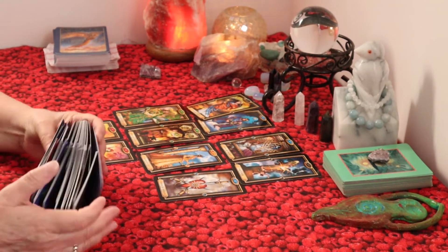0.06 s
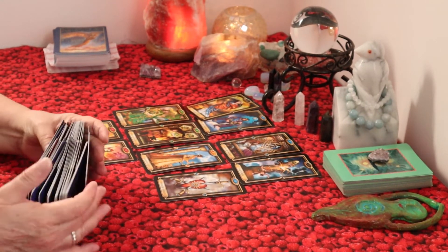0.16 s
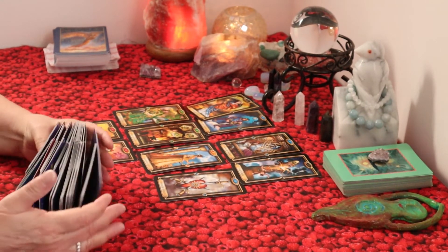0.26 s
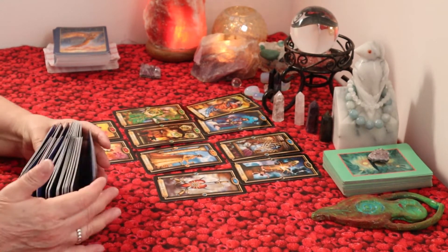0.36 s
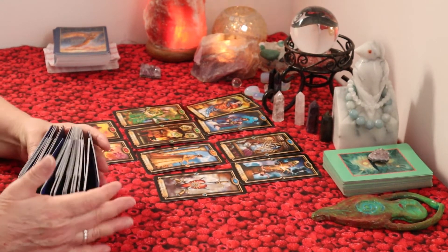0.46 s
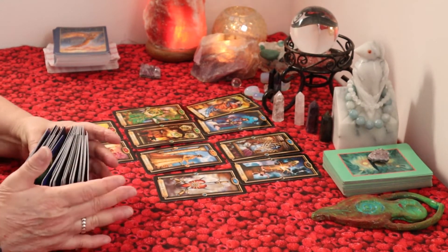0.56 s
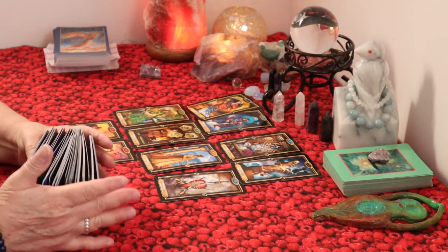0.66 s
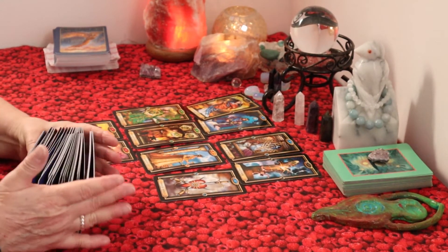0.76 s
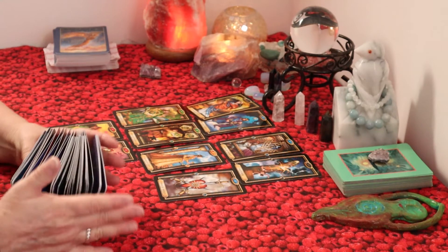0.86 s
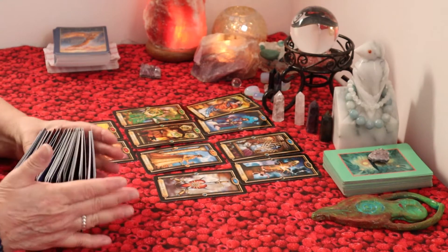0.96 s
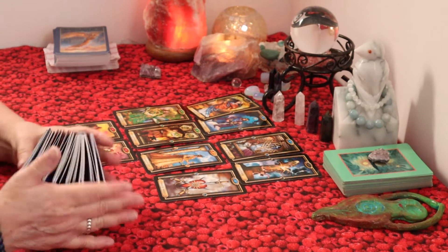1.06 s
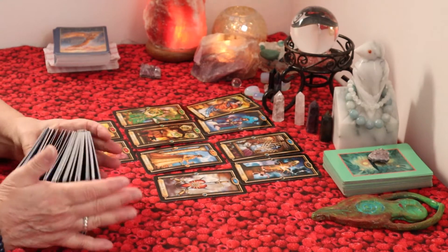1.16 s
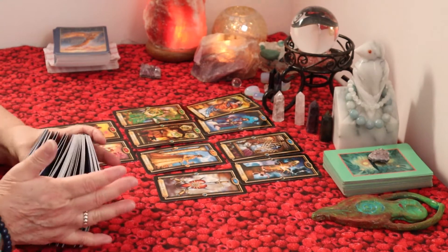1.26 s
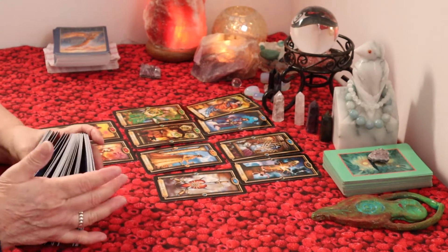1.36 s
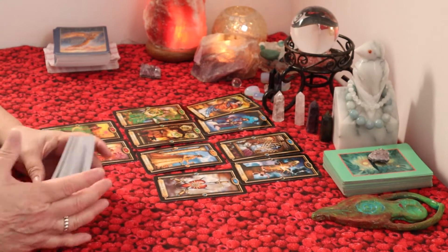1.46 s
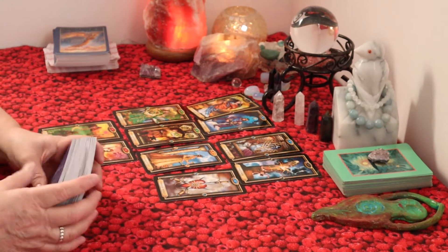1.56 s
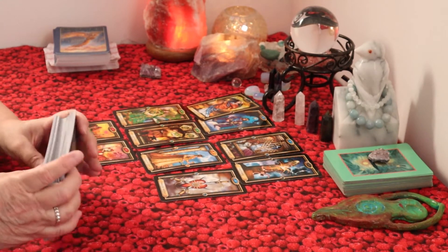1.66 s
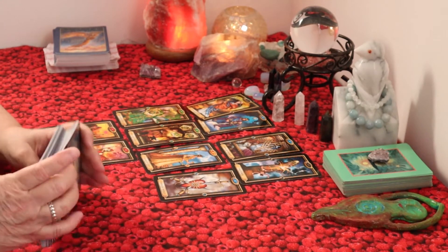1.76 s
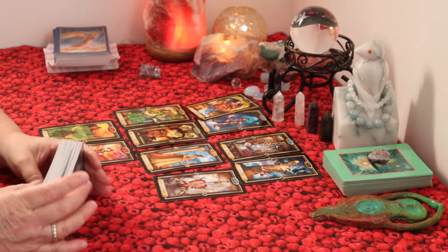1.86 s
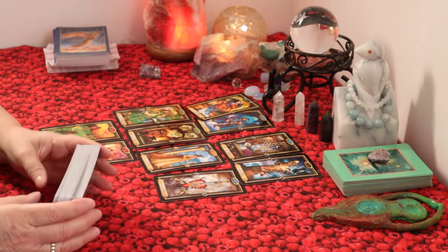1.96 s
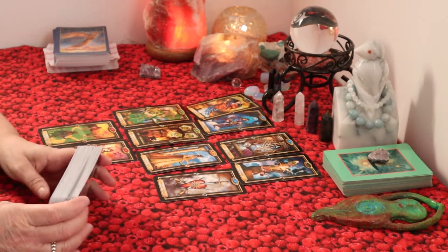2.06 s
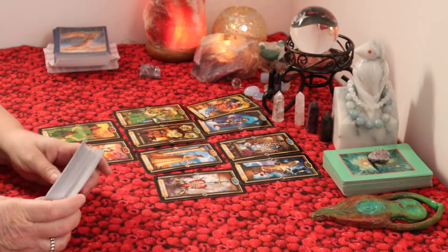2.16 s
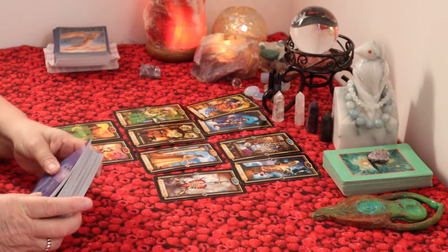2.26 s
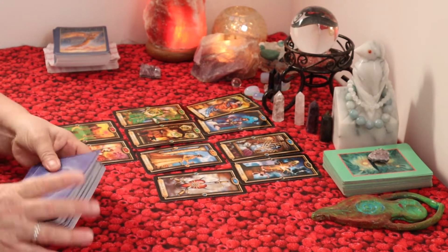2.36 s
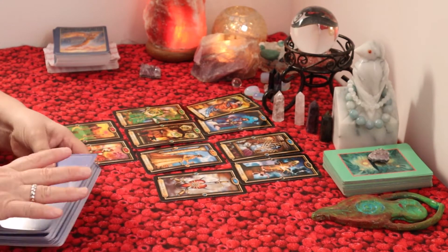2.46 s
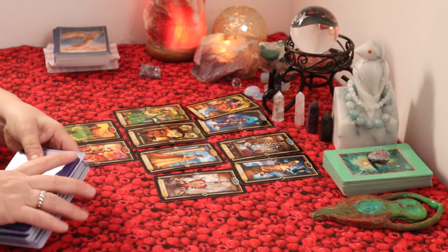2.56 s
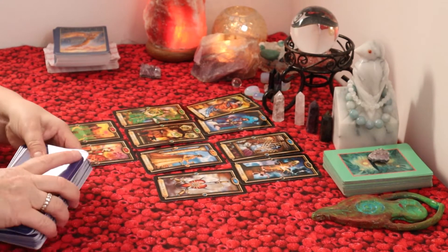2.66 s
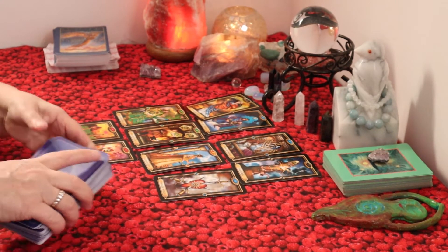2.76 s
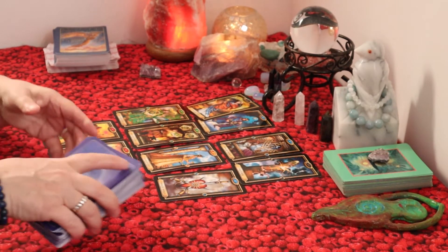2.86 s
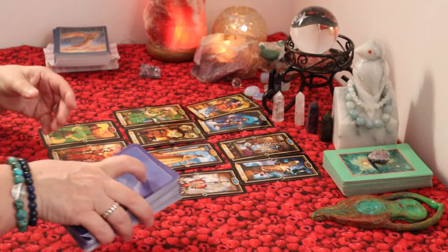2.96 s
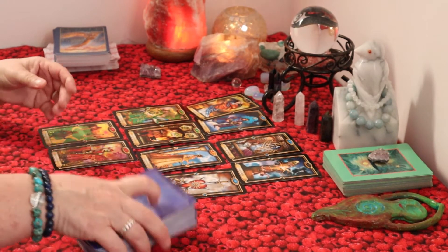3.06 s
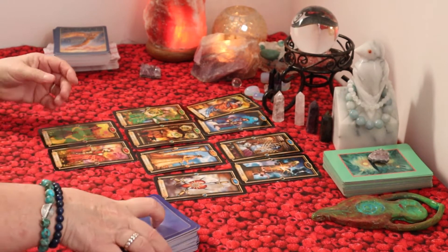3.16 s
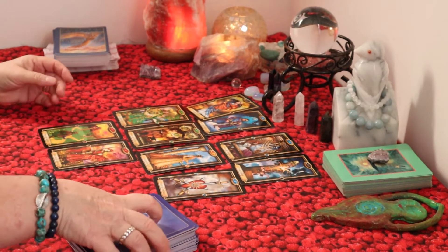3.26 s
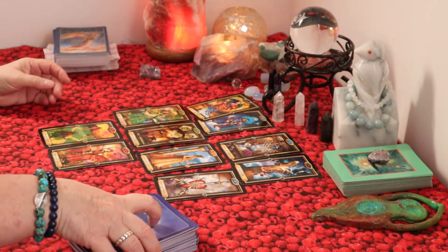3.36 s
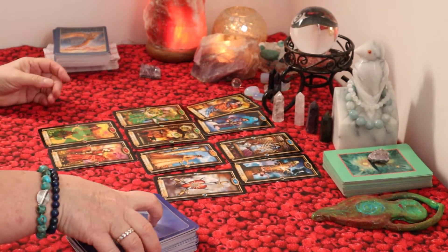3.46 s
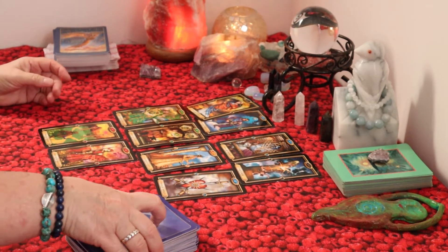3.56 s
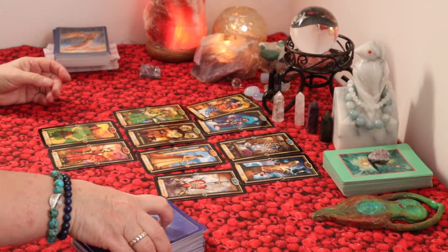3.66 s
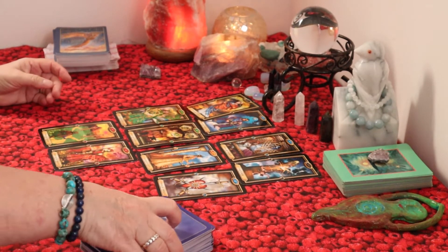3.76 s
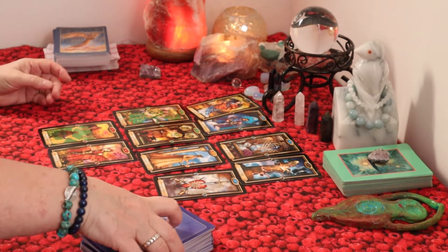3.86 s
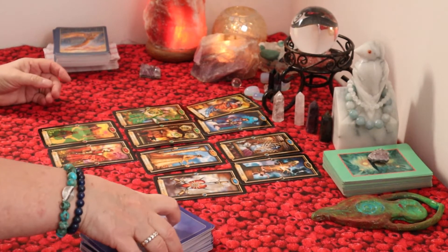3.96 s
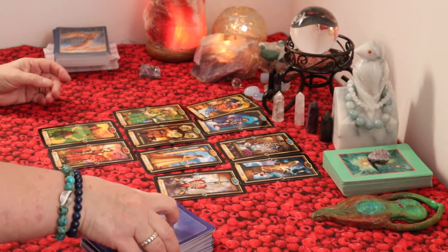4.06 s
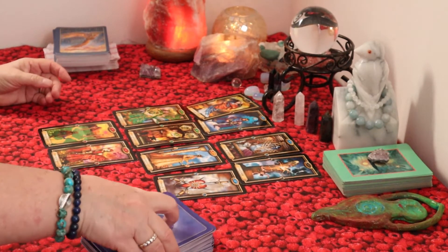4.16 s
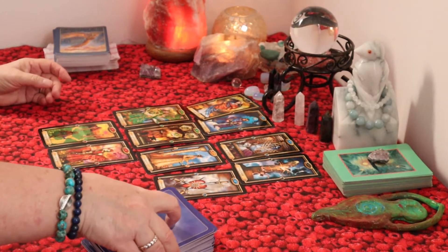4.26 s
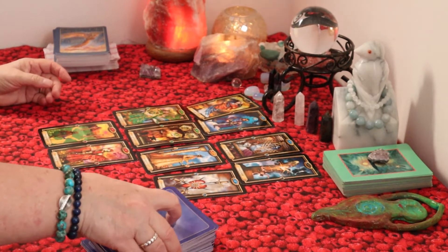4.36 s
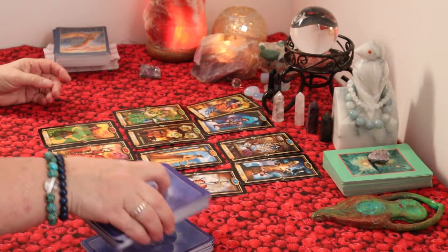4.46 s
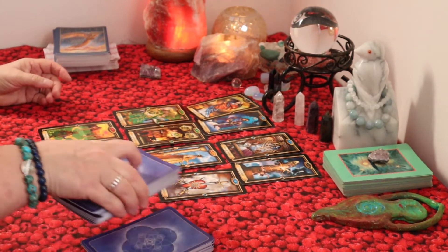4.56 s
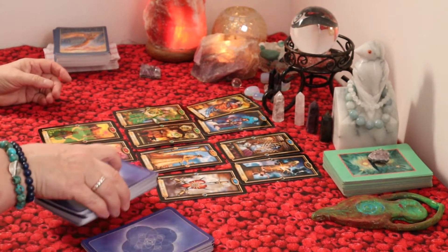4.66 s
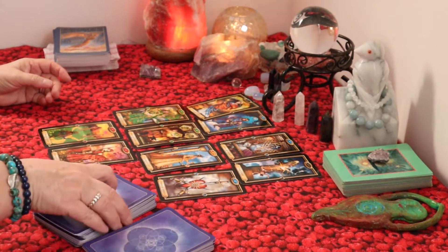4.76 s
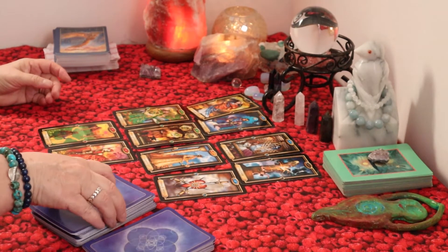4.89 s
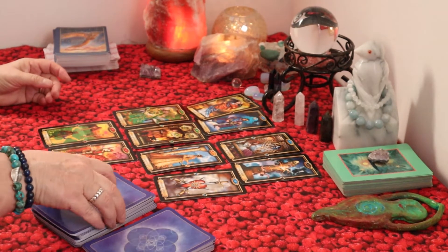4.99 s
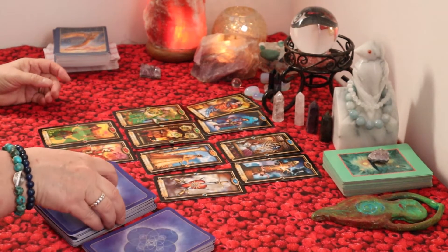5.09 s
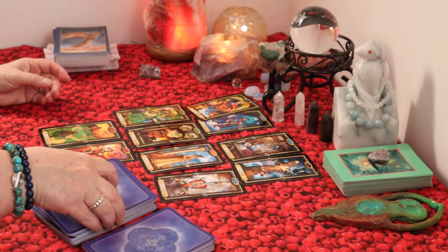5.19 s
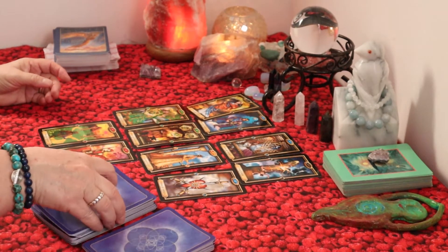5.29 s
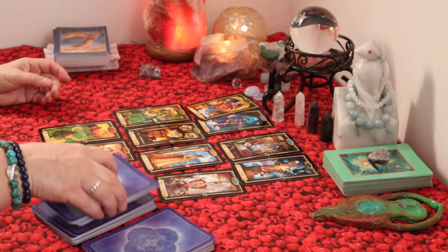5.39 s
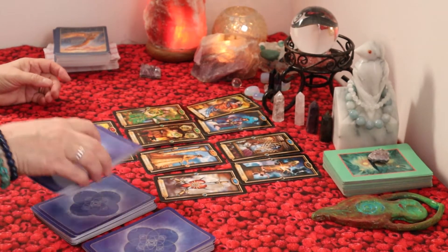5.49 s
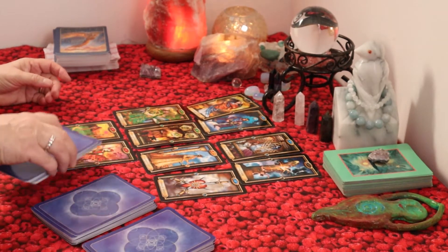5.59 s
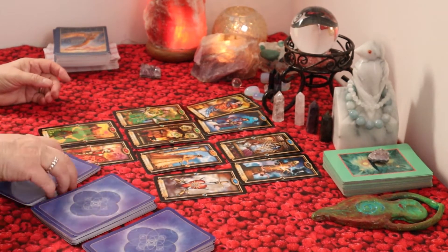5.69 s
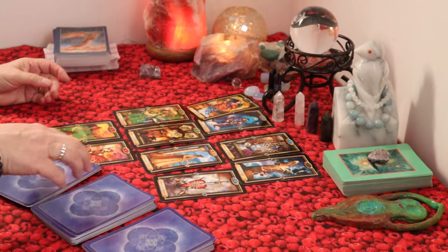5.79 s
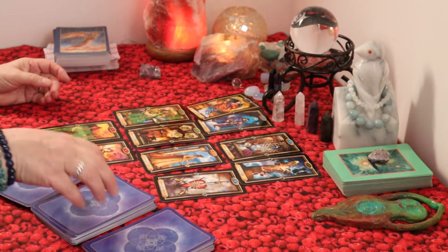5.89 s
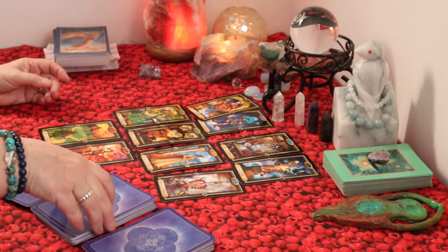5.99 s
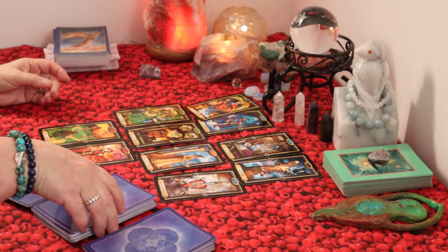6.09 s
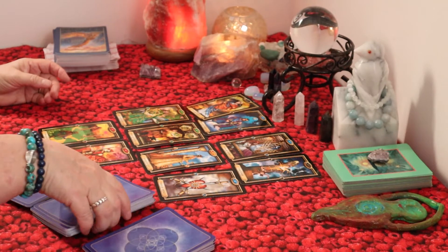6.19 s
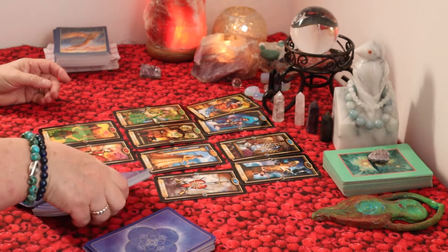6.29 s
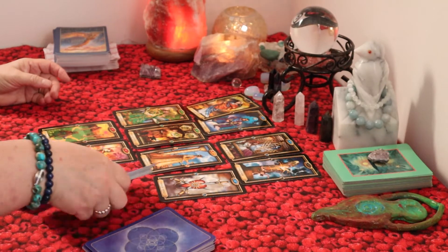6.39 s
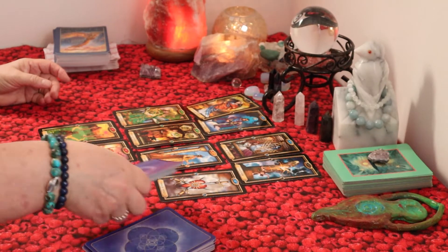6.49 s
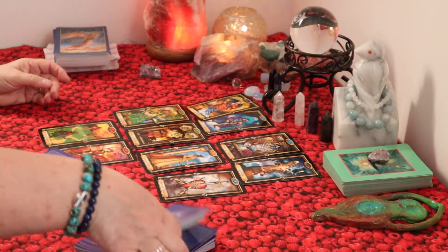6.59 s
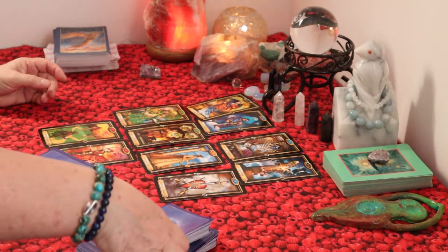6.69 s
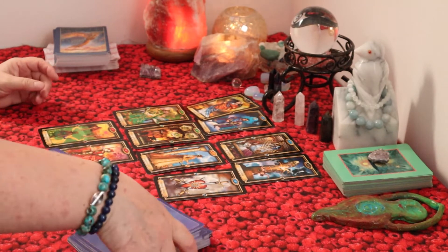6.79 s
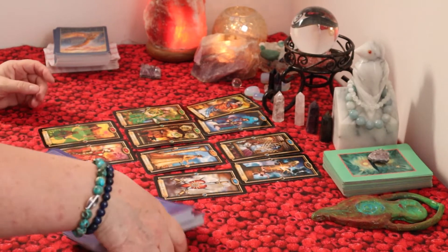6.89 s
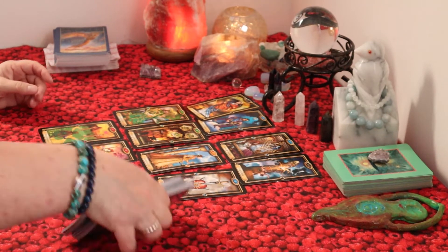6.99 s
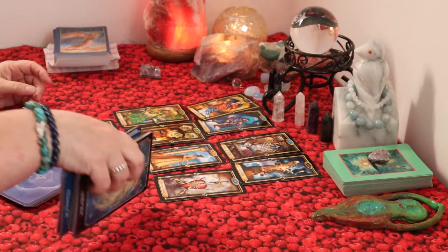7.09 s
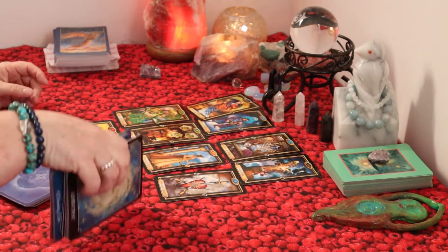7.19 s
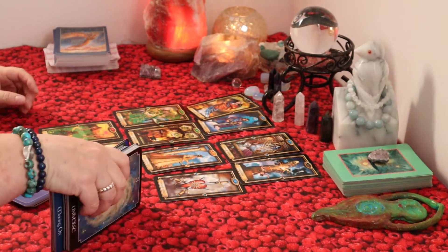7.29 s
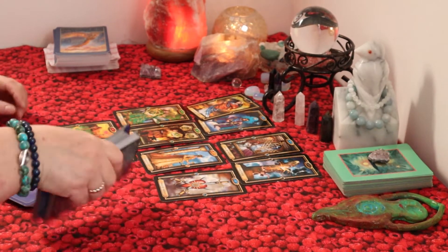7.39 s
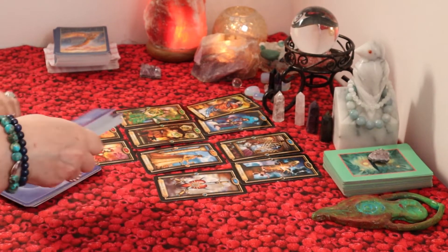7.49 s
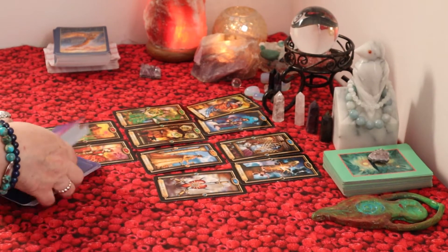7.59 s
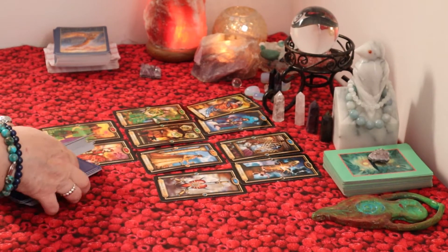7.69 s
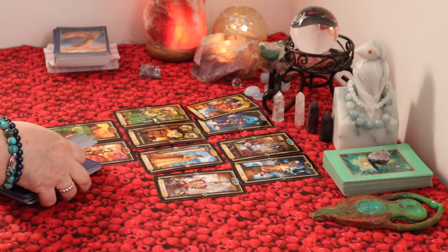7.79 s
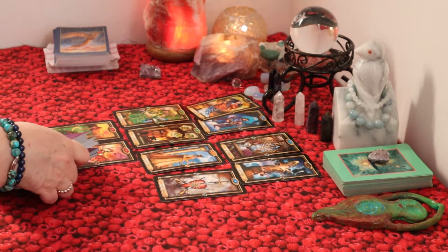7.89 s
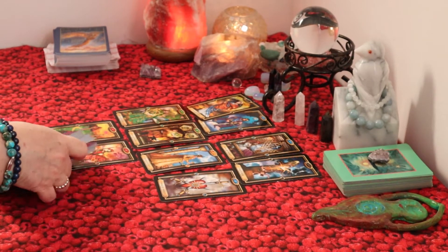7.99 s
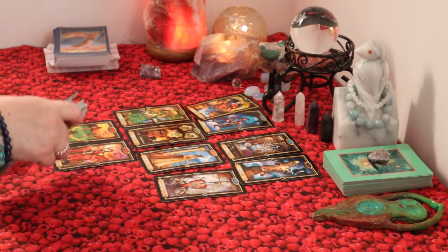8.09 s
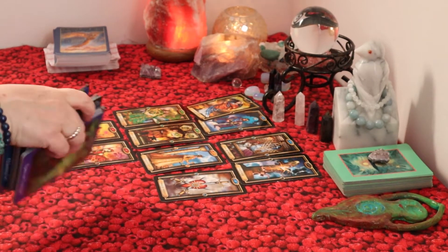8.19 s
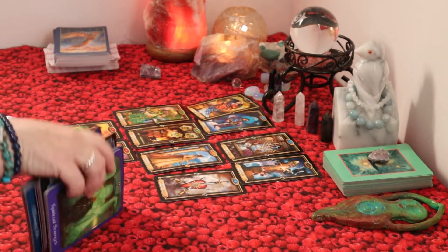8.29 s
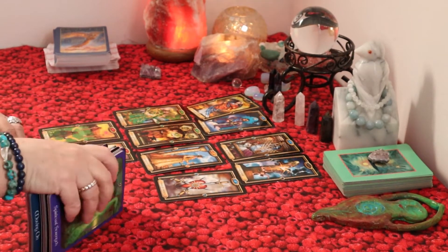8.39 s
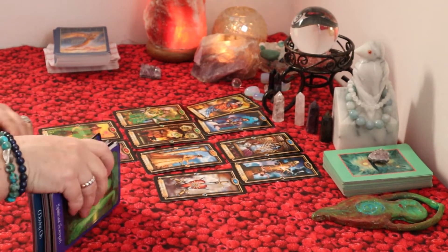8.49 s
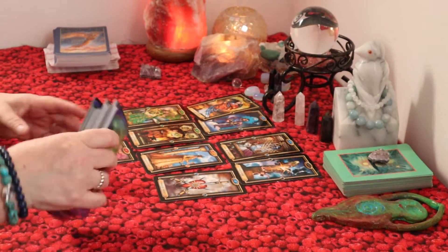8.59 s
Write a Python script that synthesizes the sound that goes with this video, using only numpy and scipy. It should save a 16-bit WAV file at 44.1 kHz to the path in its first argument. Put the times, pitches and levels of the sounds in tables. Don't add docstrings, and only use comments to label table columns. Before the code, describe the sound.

A deck of large cards is handled close to the microphone in a small room, over a faint steady hiss. From 0 to 1.5 s it is shuffled overhand: uneven soft packet slaps, strongest near 1 s, with fine papery hisses and small edge flicks. At 1.8 s the squared deck knocks sharply with an immediate rebound. Until 2.6 s, cards slide and settle lightly. At 3.1 s a hard flat slam drums the cloth-covered table with a deep thud. Quiet rubbing follows; at 4.7, 5.2 and 5.7 s piles are set down with muted thumps and a bright flick. From 6.1 to 6.8 s piles scrape, tap and snap together as they are gathered. A hard, cracking knock lands at 7.2 s, then soft sliding and faint taps, and a final quick double knock at 8.3 s, trailing into light rubbing until about 8.6 s.

```python
import sys
import numpy as np
from scipy import signal
from scipy.fft import rfft, irfft, next_fast_len
from scipy.io import wavfile
from scipy.ndimage import uniform_filter1d, map_coordinates

SR = 44100
rng = np.random.default_rng(int(sys.argv[2]) if len(sys.argv) > 2 else 0)


def volts_from_db(level):
    exponent = np.asarray(level, float) / 20
    return 10 ** exponent


def unload_wav(signal):
    wavfile.write(
        sys.argv[1],
        SR,
        np.round(np.clip(np.atleast_2d(signal).T, -1, 1) * 32767).astype(np.int16),
    )


N = 381465
SIZE = 24576

# t/s, peak level/dB, edge crack re peak/dB, stack f/Hz
PACKETS = [(0.004, -32, -9, 441), (0.074, -30, -17, 503), (0.147, -48.5, -1.5, 345), (0.29, -30.5, -7, 346),
           (0.408, -30.5, -15.5, 346), (0.585, -37, -31, 350), (0.642, -37.5, -18, 480),
           (0.771, -29.5, -35, 330), (0.859, -39, 0, 363), (0.906, -35, -13, 460), (0.974, -20, -12, 700),
           (0.997, -21.5, -12, 480), (1.062, -42, 0, 422), (1.176, -25, -14.5, 355), (1.234, -35, 0, 480),
           (1.254, -28, -30, 285), (1.358, -33.5, -10, 514), (1.525, -47, -6.5, 328)]
# t/s, peak level/dB, table top re peak/dB, edge crack re peak/dB, stack f/Hz
SLAMS = [
    (1.8, -8, -26.5, -3, 560),
    (1.82, -11, -28.5, -4.5, 580),
    (3.104, -4, -15.5, -14.5, 334),
    (7.21, -18, -17, -6, 520),
    (7.221, -4, -37, -8, 597),
    (8.318, -9, -23, -2.5, 543),
    (8.33, -7.5, -26, -7.5, 374),
]
# t/s, peak level/dB, table top re peak/dB, edge crack re peak/dB, stack f/Hz
PILES = [(1.999, -43.5, -7.5, -15, 636), (2.143, -41, -7.5, 2, 355), (2.381, -35, -14.5, -15, 348),
         (3.87, -50.5, -13, -10.5, 696), (4.21, -63.5, -8.5, 1.5, 330), (4.702, -28.5, -5.5, -8.5, 432),
         (4.784, -51.5, 7, -23, 285), (5.204, -44, 5, -22, 302), (5.673, -36.5, -1.5, -8, 335),
         (5.693, -27, -19, -21.5, 342), (6.144, -34.5, -19, -4, 598), (6.599, -36, -5.5, -2, 305),
         (6.649, -46, 5.5, -14, 290), (6.704, -28, -16, -12.5, 540), (6.792, -36.5, -10, -22, 670),
         (7.523, -40, -39, -28, 560), (7.595, -49.5, -4, 1, 333), (7.653, -37.5, -10.5, -28, 280),
         (7.849, -42.5, -24, -8, 790)]
# t/s, peak level/dB, f/Hz
HOLLOW = [
    (0.975, -22, 440),
    (1.175, -25.5, 373),
    (1.801, -13, 275),
    (2.381, -38.5, 332),
    (4.7, -28.5, 241),
    (6.717, -28.5, 318),
    (7.221, -15, 265),
]
# t of crest/s, fine hiss level/dB
PULLS = [
    (0.08, -55),
    (0.303, -58),
    (0.478, -58),
    (0.552, -76),
    (0.661, -59),
    (0.865, -54.5),
    (1.069, -55),
]
PULL_SHAPE = (8.2, 18.3, 28)
# t of crest/s, fine hiss level/dB, scrape re fine hiss/dB
SKIDS = [
    (1.811, -63.5, 20),
    (3.112, -46.5, 9.5),
    (4.714, -66, 10),
    (4.768, -68.5, 9.5),
    (5.204, -84, 12),
    (5.673, -74, 4),
    (6.706, -65.5, 15),
    (7.223, -61.5, 16),
    (8.34, -58, 14.5),
]
SKID_SHAPE = (6.3, 35.5)  # rise/ms, fall/ms
# t of crest/s, fine hiss level/dB, scrape re fine hiss/dB, fall/ms
DRAGS = [(1.258, -63, 3, 150), (1.58, -69.5, 4.5, 99), (2.013, -71, 3, 110), (2.129, -57.5, 2, 79),
         (2.312, -62, 7, 7.7), (2.558, -61.5, 8, 14), (3.324, -74.5, 4, 32), (3.63, -75.5, 12.5, 140),
         (3.831, -83, -15.5, 81), (6.151, -71.5, 18.5, 55), (6.239, -60, -2.5, 21), (6.372, -56.5, 10, 27),
         (6.6, -64, 5, 30), (6.797, -63, 9, 120), (7.043, -63, 7, 23), (7.289, -63, -0.5, 44),
         (7.462, -70.5, 12, 55), (7.596, -66.5, 7, 99), (7.825, -66, 9.5, 46), (8.005, -70.5, 2, 21),
         (8.222, -65.5, 3.5, 23), (8.451, -67.5, 10, 140), (8.605, -67, 5, 67)]
# t/s, effort as rumble level/dB
STIR = [(0, -43), (0.11, -60), (0.42, -51), (0.55, -56), (1.1, -38.5), (1.5, -56.5), (1.8, -68),
        (2.19, -51), (2.33, -68), (3.47, -66), (3.68, -49.5), (3.85, -64), (4.68, -77.5), (5.9, -66),
        (7.1, -54), (7.3, -79), (7.75, -52.5), (8.65, -79.5)]
# t/s, peak level/dB, top re body/dB, card f/Hz
FLICKS = [(0.0606, -33.5, -6, 1500), (0.29, -39, -11, 2330), (0.3937, -47, -1, 2400),
          (0.4435, -53, 0, 1800), (0.4604, -52, -11, 2690), (0.634, -53, 8, 2350), (1.041, -45, -7, 1690),
          (1.065, -34, -3, 1920), (1.198, -55, 14, 1870), (1.2352, -37, 2, 1590), (2.3055, -55, -13, 1820),
          (2.437, -49, -13, 3220), (2.5462, -45, 1, 900), (3.1033, -23, -31, 2050),
          (3.2347, -33.5, -10.5, 2410), (3.871, -49, -22, 2360), (4.7037, -38, -27, 1600),
          (5.2018, -42, -4, 1790), (5.672, -28.5, -7, 3520), (6.1448, -29.5, -15, 2400),
          (6.336, -47, -30, 2550), (6.574, -35.5, -3, 2260), (6.6013, -25, -12, 1820),
          (6.7, -19, -17.5, 3000), (6.7913, -34.5, -13.5, 1610), (6.8434, -34.5, -8, 2500),
          (7.2216, -7.5, -41, 2780), (7.8231, -43, -42, 1610), (7.9046, -43, -26, 1620),
          (7.9984, -42.5, -18, 1585)]
# t/s, peak level/dB
THUDS = [(0.491, -49.5), (0.761, -53), (0.868, -53), (1.058, -49), (1.166, -43.5), (1.234, -42.5),
         (1.506, -54), (1.791, -42.5), (1.988, -49), (2.363, -58), (3.093, -24.5), (3.86, -56.5),
         (4.193, -52.5), (4.702, -33), (4.78, -36), (4.959, -58), (5.193, -35.5), (5.398, -54.5),
         (5.672, -42.5), (6.017, -54), (6.237, -55.5), (6.578, -41.5), (6.646, -43), (6.783, -47),
         (6.969, -57), (7.206, -40), (7.6, -50), (7.649, -47.5), (7.906, -55), (8.309, -33.5)]
# f/Hz, level/dB, t60/s
TABLE_TOP = [(134.9, 1.5, 0.41), (206.8, -7.5, 0.22), (255.5, -9, 0.27), (345, -3, 0.5), (420, -13, 0.49),
             (501, -11.5, 0.42)]
# f/Hz, density level/dB
CRACK_COLOUR = [(300, -40), (700, -3.5), (1500, -6.5), (3000, -15), (4500, -35), (9000, -57),
                (16000, -90.5)]
# f/Hz, density level/dB
FINE_COLOUR = [(2500, -39), (5000, 3.5), (8000, 0.5), (11000, -0.5), (12600, -4.5), (15500, -20.5)]
# f/Hz, density level/dB
SCRAPE_COLOUR = [(400, -23.5), (900, -0.5), (2500, -0.5), (4500, -4), (7000, -30), (12000, -57.5)]
# f/Hz, density level/dB
HANDS_COLOUR = [(18, -45.5), (35, 2), (97, -5), (135, 1), (200, -7), (340, 0), (500, -8), (1200, -19),
                (2600, -69)]
# f/Hz, t60/s
ROOM = [(60, .45), (160, 0.32), (350, 0.45), (600, 0.35), (1100, 0.44), (2900, 0.3), (7700, 0.32)]
# f/Hz, side re mid/dB
CARDS_SIDE = [(60, -26.5), (110, -43.5), (200, -16.5), (380, -15.5), (700, -6.5), (1290, -1), (2380, 2),
              (4400, 3.5), (8120, 4), (15000, 9)]
# f/Hz, density level/dB
HISS_COLOUR = [(15, -38), (25, 1.5), (107, -10), (140, -4), (184, -16), (283, -11), (554, -17.5),
               (601, -12.5), (900, -17.5), (2790, -21), (15600, -45)]
# f/Hz, side re mid/dB
HISS_SIDE = [(60, -19.5), (110, -6.5), (200, 1), (380, 6), (700, 4.5), (1290, 6.5), (2380, 4), (4400, 6.5),
             (8120, 6.5), (15000, 2)]

PACKET_MS, SLAM_MS, PILE_MS, HOLLOW_MS = 7.6, 15.7, 8.6, 12
PACKET_MS_PER_DB = 0.3
PACKET_SWELL = 2.2
PACKET_TABLE_DB, PACKET_TABLE_GROWS = -51, 0.75
HOLLOW_TABLE_DB, HOLLOW_CRACK_DB = -37, -35
DRAG_RISE_MS, DRAG_RISE_SHARE = 11, 0.15
RUB_DB, RUB_GROWS = -73, 0.32
SHUDDER_DB, SHUDDER_T60 = -13.5, 0.55
FLICK_MS, FLICK_STIFF = 7, 0.39
THUD_HZ, THUD_HZ_PER_DB = 66.9, 0.36
THUD_T60, THUD_T60_PER_DB = 0.19, 0.01
FIRST_WALL_S = 0.005
HISS_DB = -65


def landings():
    rows = []
    for s, db, crack_db, hz in PACKETS:
        table_db = PACKET_TABLE_DB + PACKET_TABLE_GROWS * (db + 36) - db
        ms = PACKET_MS - PACKET_MS_PER_DB * (db + 29)
        rows.append((s, db, table_db, crack_db, hz, ms, PACKET_SWELL))
    rows += [(*row, SLAM_MS, 1) for row in SLAMS]
    rows += [(*row, PILE_MS, 1) for row in PILES]
    rows += [(s, db, HOLLOW_TABLE_DB, HOLLOW_CRACK_DB, hz, HOLLOW_MS, 1) for s, db, hz in HOLLOW]
    return rows


def knocks():
    s, db, table_db, crack_db, hz, ms, swell = np.transpose(landings())
    pitch = hz[:, None]
    f, t = np.fft.rfftfreq(SIZE, 1 / SR), np.arange(SIZE // 8) / SR
    u = t / (np.clip(ms, 1, 60)[:, None] / 1000)
    draw = rng.standard_normal((len(s), 2, len(t)))

    onset = 0.0021 * swell[:, None] * volts_from_db(-0.3 * (db[:, None] + 8))
    contacts = draw[:, 0] * np.abs(draw[:, 0])
    landing = rfft(contacts * np.exp(-u) * (1 - np.exp(-t / onset)), SIZE)
    landing = landing / uniform_filter1d(np.abs(landing), SIZE // 200, axis=1)

    spread = np.exp(0.094 * draw[:, 1])
    stack = mode(f, pitch, 0.32 * pitch)
    stack = stack - 0.36 * mode(f, 1.635 * pitch * spread[:, :1], 210)
    stack = stack - 0.31 * mode(f, 0.46 * pitch * spread[:, 1:2], 140)
    stack = stack * mode(f, 0.92 * pitch, 2.18 * pitch)
    ring = peaked(landing * stack, db - 1.5)

    dull = 1 / (1 + 1j * f / (4000 * volts_from_db(0.28 * (crack_db[:, None] + 11.5)))) ** 2
    crack = peaked(landing * causal(CRACK_COLOUR, SIZE) * dull, db + crack_db - 1.5)

    top = sum((-1) ** k * volts_from_db(g) * mode(f, c, 4 / t60) for k, (c, g, t60) in enumerate(TABLE_TOP))
    thrust = rfft(u * np.exp(-2 * u), SIZE) * 1j * f
    push = thrust + 0.015 * landing * f[-1]
    drum = peaked(push * top * mode(f, 110, 250), db + table_db + 9)

    start = np.maximum(s - 0.0015 - 0.58 * onset[:, 0], 0)
    return placed(start, ring + crack + drum, wet_db=-4.5, aside_db=-6, blur_hz=30)


def strokes():
    pulls = [(*row, *PULL_SHAPE) for row in PULLS]
    skids = [(*row, *SKID_SHAPE) for row in SKIDS]
    drags = [(s, db, scrape, DRAG_RISE_MS + DRAG_RISE_SHARE * fall, fall) for s, db, scrape, fall in DRAGS]
    return pulls + skids + drags


def clump(rate_hz):
    points = rng.standard_normal(int(N * rate_hz / SR) + 4)
    return map_coordinates(points, [np.arange(N) / SR * rate_hz])


def slides():
    at = np.arange(N) / SR
    effort_db = np.interp(at, *np.transpose(STIR))
    fine = volts_from_db(RUB_DB + RUB_GROWS * (effort_db + 60) - 6.5)
    scrape = fine * volts_from_db(7)
    for crest, db, scrape_db, rise, fall in strokes():
        near = slice(max(0, round((crest - 0.25) * SR)), round((crest + 0.5) * SR))
        ms = 1000 * (at[near] - crest)
        stroke = np.exp(-np.where(ms < 0, 0.5 * (ms / rise) ** 2, np.abs(ms / fall)))
        fine[near] += volts_from_db(db) * stroke
        scrape[near] += volts_from_db(db + scrape_db - 4) * stroke

    bunching = volts_from_db(1.8 * clump(60) + 1.1 * clump(300) + 1.9 * clump(1800))
    grains = bunching * rng.standard_normal((2, 2, N))
    hiss = fine * unit(coloured(grains[0], FINE_COLOUR))
    rasp = scrape * unit(coloured(grains[1], SCRAPE_COLOUR))

    stir = unit(coloured(volts_from_db(1.4 * clump(25)) * rng.standard_normal((2, N)), HANDS_COLOUR))
    shudder = np.zeros(N)
    for s, db, table_db, *_ in SLAMS:
        shudder += (at > s) * volts_from_db(db + table_db + SHUDDER_DB - 60 * np.abs(at - s) / SHUDDER_T60)
    return hiss + rasp + (volts_from_db(effort_db - 4.5) + shudder) * stir


def flicks():
    s, db, bright_db, hz = np.transpose(FLICKS)
    ms = FLICK_MS * (hz / 2300) ** FLICK_STIFF
    f, t = np.fft.rfftfreq(SIZE, 1 / SR), np.arange(SIZE // 8) / SR
    u = t / (np.clip(ms, 0.5, 40)[:, None] / 1000)
    snap = rfft(rng.standard_normal((len(s), len(t))) * np.exp(-u), SIZE)
    ring = 0.19 + mode(f, hz[:, None], 570)
    body = peaked(snap * causal(SCRAPE_COLOUR, SIZE) * ring, db - 5)
    edge = peaked(snap * causal(FINE_COLOUR, SIZE), db + bright_db - 7)
    return placed(s - 0.0015, body + edge, wet_db=-5.5, aside_db=-4, blur_hz=400)


def thuds():
    out, t = np.zeros(N + SIZE), np.arange(SIZE) / SR
    for s, db in THUDS:
        hz = THUD_HZ + THUD_HZ_PER_DB * (db + 44.5)
        t60 = THUD_T60 + THUD_T60_PER_DB * (db + 45.5)
        envelope = volts_from_db(db + 9 - 60 * t / t60) * (1 - np.exp(-t / 0.0044))
        swing = np.sin(2 * np.pi * 0.99 * hz * t) * envelope
        out[round((s + 0.006) * SR):][:SIZE] += swing
    return out[:N] * np.array([[1], [0.3]])


def tails(count):
    hz, t, z = signal.stft(rng.standard_normal((count, 2, 2 * SIZE // 3)), SR, nperseg=256)
    decay = volts_from_db(-60 * t / along(ROOM, hz)[:, None])
    tail = signal.istft(z * decay, SR, nperseg=256)[1]
    tail = tail * (1 - np.exp(-np.arange(tail.shape[-1]) / SR / 0.003))
    return tail / np.linalg.norm(tail, axis=-1, keepdims=True)


def placed(times, spectra, wet_db, aside_db, blur_hz):
    f = np.fft.rfftfreq(SIZE, 1 / SR)
    ports = np.array([1, 1j * volts_from_db(aside_db)])[:, None]
    power = uniform_filter1d(np.abs(spectra) ** 2, round(blur_hz * SIZE / SR), axis=1)
    heard = np.sqrt(np.abs(power)) * np.exp(-2j * np.pi * f * FIRST_WALL_S)
    room = heard[:, None] * volts_from_db(wet_db) * rfft(tails(len(times)), SIZE)
    sounds = irfft(spectra[:, None] * ports + room, SIZE)
    sounds = sounds * np.clip((0.85 * SIZE - np.arange(SIZE)) / (0.2 * SIZE), 0, 1)
    out = np.zeros((2, N + SIZE))
    for s, sound in zip(times, sounds):
        out[:, round(s * SR):][:, :SIZE] += sound
    return out[:, :N]


def left_right(pair, side_colour):
    side = coloured(pair[1], side_colour)
    return np.array([pair[0] + side, pair[0] - side])


def port_hiss():
    return volts_from_db(HISS_DB) * unit(coloured(rng.standard_normal((2, N)), HISS_COLOUR))


def unit(x):
    return x / np.sqrt(np.mean(x ** 2, axis=-1, keepdims=True) + 1e-20)


def along(points, hz):
    f, v = np.transpose(points)
    return np.interp(np.log(hz + 1), np.log(f + 1), v)


def causal(points, size):
    gain = volts_from_db(along(points, np.fft.rfftfreq(size, 1 / SR)))
    cep = irfft(np.log(gain + 1e-4), size)
    cep[1:size // 2] *= 2
    cep[size // 2 + 1:] = 0
    return np.exp(rfft(cep))


def coloured(x, points):
    m = next_fast_len(N + SIZE)
    gain = volts_from_db(along(points, np.fft.rfftfreq(m, 1 / SR)))
    return irfft(rfft(x, m) * gain, m)[..., :N]


def mode(f, hz, width_hz):
    return 1j * f * width_hz / (hz * hz - f * f + 1j * f * width_hz)


def peaked(spectra, db):
    top = np.abs(irfft(spectra, SIZE)).max(axis=-1)
    return spectra * (volts_from_db(db) / top)[:, None]


def scene():
    cards = knocks() + slides() + flicks() + thuds()
    return left_right(cards, CARDS_SIDE) + left_right(port_hiss(), HISS_SIDE)


def low_pass(x):
    return signal.sosfilt(signal.butter(12, 15800, fs=SR, output="sos"), x)


def record(dry):
    mix = dry / (1 + np.abs(dry) ** 8) ** (1 / 8)
    return low_pass(mix)


dry = scene()
out = record(dry)
unload_wav(out)
```